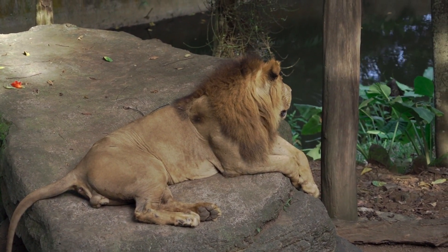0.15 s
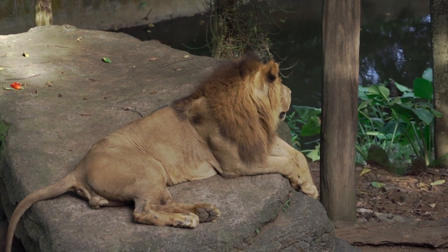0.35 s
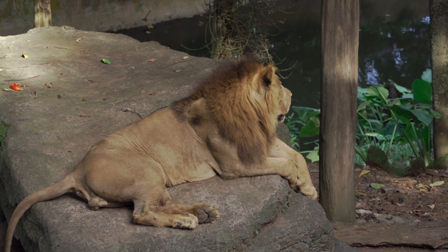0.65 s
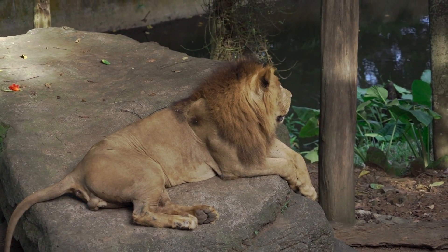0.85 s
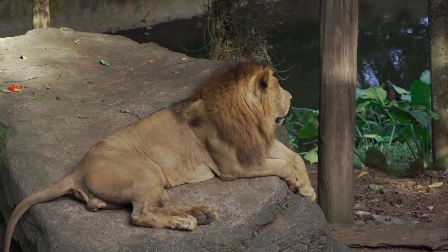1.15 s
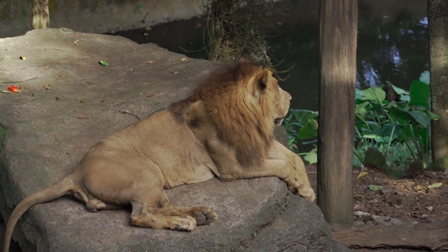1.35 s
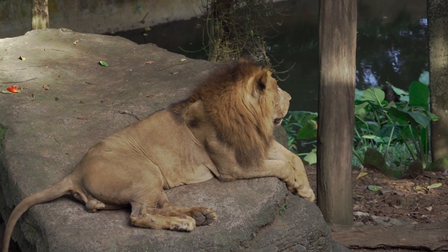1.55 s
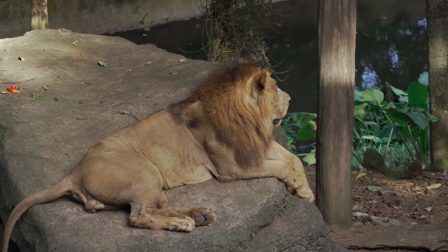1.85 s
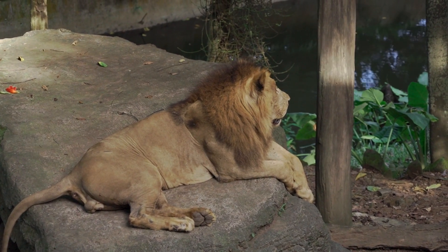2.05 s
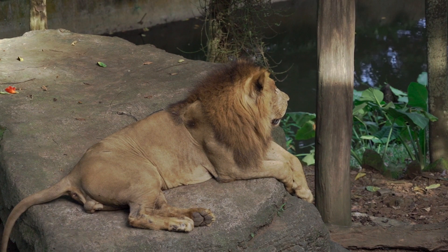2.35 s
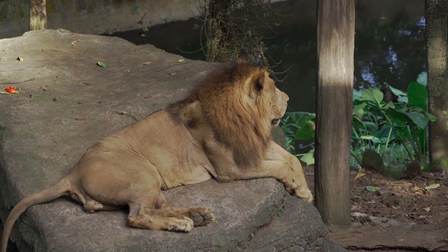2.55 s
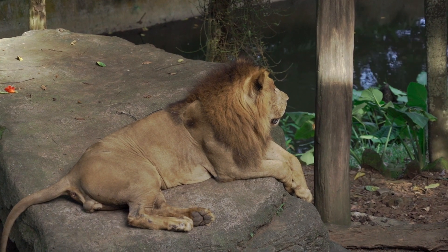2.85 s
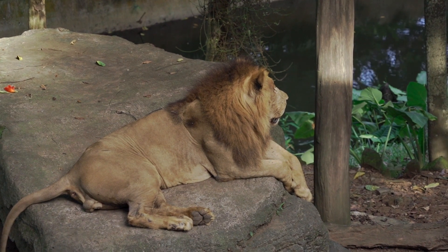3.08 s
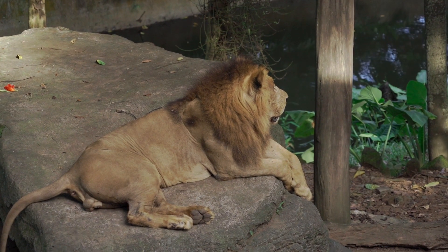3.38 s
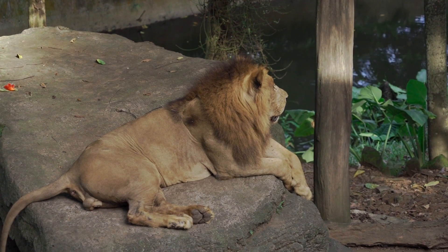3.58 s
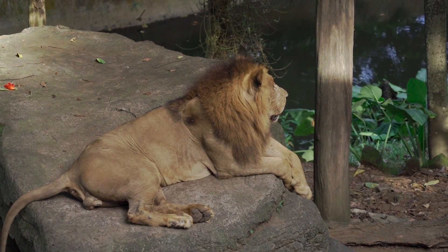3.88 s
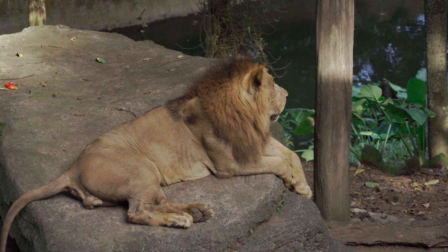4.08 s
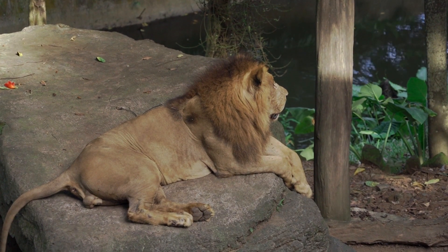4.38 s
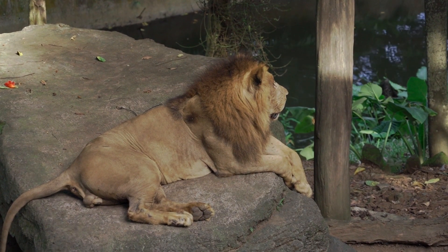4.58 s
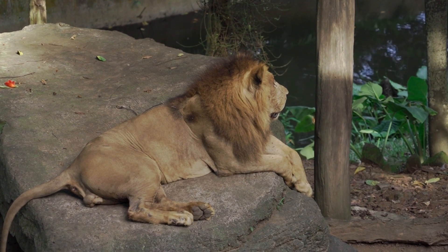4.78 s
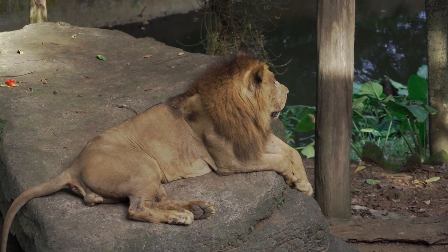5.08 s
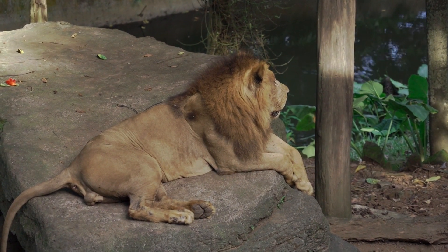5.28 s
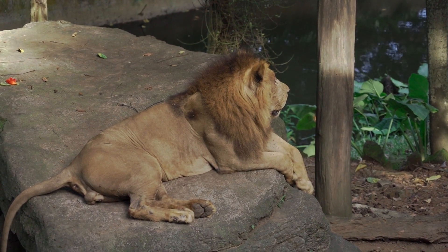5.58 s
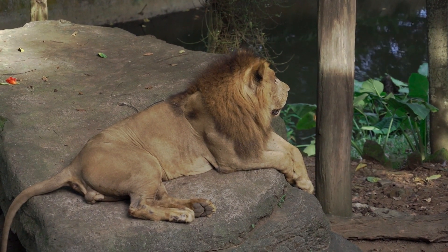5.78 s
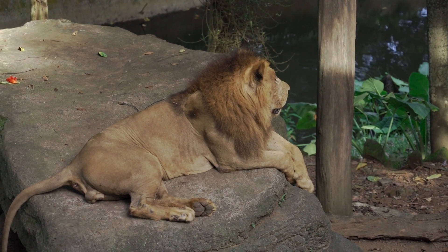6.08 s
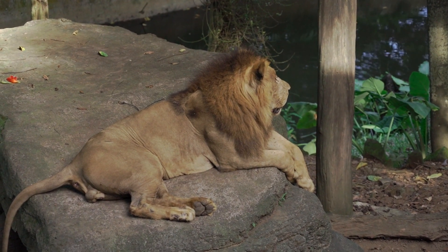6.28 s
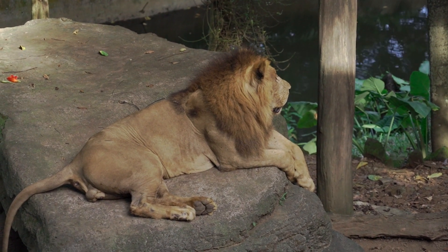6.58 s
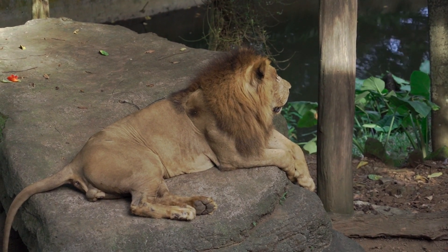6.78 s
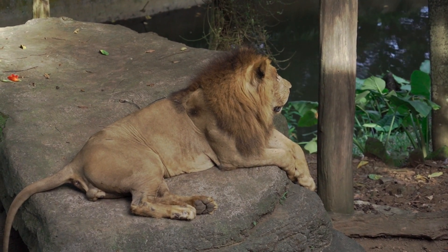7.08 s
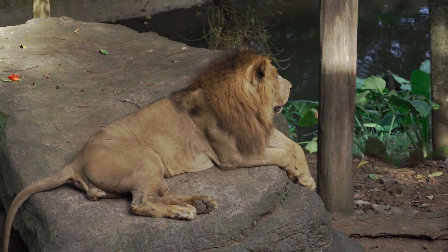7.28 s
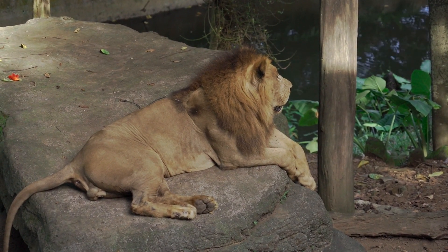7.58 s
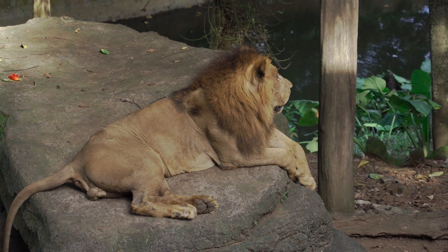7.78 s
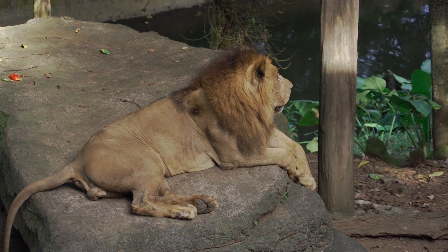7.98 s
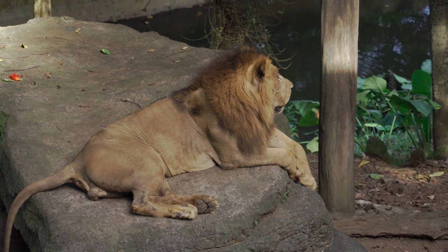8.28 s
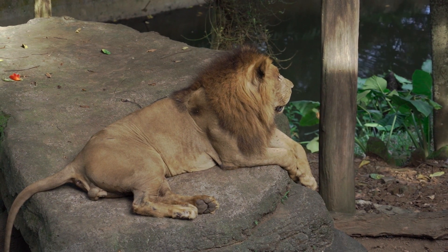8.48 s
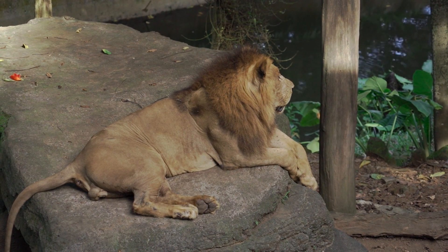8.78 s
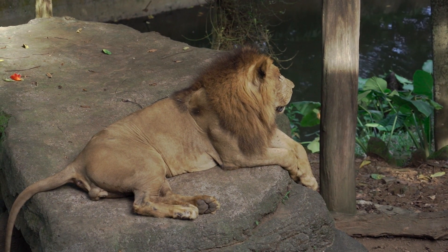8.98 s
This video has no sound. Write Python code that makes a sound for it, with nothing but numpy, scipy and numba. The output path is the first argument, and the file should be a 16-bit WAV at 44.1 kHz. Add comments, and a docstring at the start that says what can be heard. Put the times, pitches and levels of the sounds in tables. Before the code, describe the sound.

A male lion roars right from the start, off to the right in a large hard-walled enclosure. The first roar is rough and throaty, rising and then sinking into a deep growl before it ends at about 1 second. Two somewhat softer roars follow, from about 2 to 3 seconds and from 4 to 5 seconds. A stronger, more moaning fourth roar runs from 6 to 7 seconds, and a strong, breathy fifth from about 7.7 to 8.6 seconds. Each starts quickly with an uneven rattle in the throat, carries a rasp of air and trails off low. The walls ring on for a couple of seconds after every roar, filling the gaps and spreading a little to the left. A faint steady hiss and a distant, wavering low hum lie underneath as the last echo fades at around 9 seconds.

```python
"""Five lion roars ring out in a large hard-walled enclosure, off to the right.
The male's slack vocal folds flap unevenly, now and then slapping hard, into a long throat whose
resonances rise and sink with the larynx. The mouth rings, air rasps past the folds, and each roar
runs out in a deep growl. The walls ring on for seconds, over a faint hiss and a wavering far hum."""
import sys
import numpy as np
from scipy import signal
from scipy.fft import rfft, irfft, next_fast_len
from scipy.io import wavfile
from scipy.ndimage import uniform_filter1d, map_coordinates
from numba import njit

SR = 44100
rng = np.random.default_rng(int(sys.argv[2]) if len(sys.argv) > 2 else 0)


def output_pcm(signal):
    """Save a mono or channel-first signal as 16-bit PCM at the path in sys.argv[1].

    Samples are clipped to [-1, 1] before scaling.
    """
    pcm = np.clip(np.atleast_2d(signal).T, -1, 1) * 32767
    wavfile.write(sys.argv[1], SR, np.round(pcm).astype(np.int16))


N = 403074
T = np.arange(N) / SR

# the growl at the tail of each roar: t/s, level/dB
GROWLS = [(0.581, -63), (2.718, -83), (4.8, -73), (6.77, -60), (8.45, -64)]
# the hardest slaps of the folds: t/s, strength/dB, send to the two lowest resonances/dB, to the mouth/dB
SLAPS = [(0.117, -33, 5.5, -16), (0.143, -32, -1, -18), (0.168, -34.5, -9, -4), (0.191, -35, 7.5, -12),
         (0.281, -37, 3, 5), (0.49, -37, -9, 2), (1.968, -51.5, -7.5, 7), (2.023, -50, -1.5, -6),
         (2.048, -53, 0, -3), (2.214, -47, 1, 3), (2.285, -47.5, 1, -2.5), (2.302, -51, 13, -3.5),
         (2.35, -48, 8, -6), (4.066, -54.5, 2, -1.5), (4.117, -44, 7, 0), (4.29, -45.5, -2, 1),
         (4.316, -45, -13, -8), (4.345, -48, -3, -2), (4.383, -42, -19, -3), (4.41, -41, 4, -9),
         (4.471, -41, -6, -6.5), (4.521, -46, -9, 0), (6.066, -40.5, 7, -6), (6.128, -36, 2.5, -8.5),
         (6.219, -37.5, 1.5, -3), (6.278, -40.5, -4.5, -7), (6.314, -37, -6, 2), (6.357, -34, -4, -11),
         (6.391, -31, -9, -9), (6.493, -29.5, -4.5, -5), (6.691, -36.5, 1, -6), (7.742, -59, -9, 0),
         (7.799, -44, 1, -5.5), (7.867, -44.5, 0, -3), (7.967, -34.5, -4, 4), (8.064, -39, -3, 6)]


def amp(db):
    """Decibels to gain."""
    return 10 ** (np.asarray(db) / 20)


def unit(x):
    """Scaled to rms 1."""
    return x / np.sqrt(np.mean(x ** 2) + 1e-20)


def along(points, hz):
    """Read (f/Hz, value) breakpoints on a log axis."""
    f, v = np.transpose(points)
    return np.interp(np.log(hz + 1), np.log(f + 1), v)


def curves(rows):
    """An automation curve for each column after the time."""
    s, *cols = np.transpose(rows)
    return [np.interp(T, s, c) for c in cols]


def swells(rows):
    """A bell-shaped swell for each (t/s, level/dB, half-width/s)."""
    return sum(amp(db) * np.exp(-((T - s) / width) ** 2) for s, db, width in rows)


def wobble(rate):
    """A smooth random curve, rate knots a second."""
    return map_coordinates(rng.standard_normal(int(N * rate / SR) + 4), [T * rate])


def sine(hz):
    """A tone that follows a pitch curve."""
    return np.sin(2 * np.pi * np.cumsum(hz) / SR)


def filtered(x, response):
    """x times a complex response of frequency."""
    m = next_fast_len(x.shape[-1] + SR // 2)
    return irfft(rfft(x, m) * response(np.fft.rfftfreq(m, 1 / SR)), m)[..., :x.shape[-1]]


def eq(x, points):
    """Colour x with (f/Hz, gain/dB) breakpoints."""
    return filtered(x, lambda f: amp(along(points, f)))


def band(x, hz, width, stages=2):
    """Static band-passes in series, gain 1 at the centre."""
    return filtered(x, lambda f: (1j * f * width / (hz * hz - f * f + 1j * f * width)) ** stages)


def paired(two, likeness):
    """Two unrelated signals mixed to a given left-right likeness."""
    turn = lambda f: np.arccos(np.clip(along(likeness, f), -1, 1)) / 2
    mid, side = filtered(two, lambda f: np.array([np.cos(turn(f)), np.sin(turn(f))]))
    return np.array([mid + side, mid - side])


@njit
def glide(x, hz, width):
    """A resonance whose centre moves: a spinning, fading phasor fed by x."""
    step = np.exp((2j * np.pi * hz - np.pi * width) / SR)
    y, z = np.empty(len(x)), 0j
    for i in range(len(x)):
        z = z * step[i] + x[i]
        y[i] = z.real
    return y


def resonance(flow, slaps, hz, width):
    """A sharp moving resonance in a wide one; a gentle compressor evens the flow, slaps stay sharp."""
    body, hit = [glide(glide(x, hz, width), hz, 3 * width) for x in (flow, slaps)]
    size = np.std(body)
    power = np.abs(uniform_filter1d(body ** 2, SR // 15)) / size ** 2
    return unit(body / (power + 0.044) ** 0.28) + hit / size


def hiss():
    """A thin, steady bed of noise."""
    # hiss colour: f/Hz, level/dB
    colour = [(20, -25.5), (50, -2.5), (120, -12), (500, -5.5), (1200, -9.5), (2500, -26), (5000, -29),
              (10800, -35.5), (11500, -44.5), (16000, -47)]
    noise = eq(rng.standard_normal((2, N)), colour)
    return amp(-70) * unit(paired(noise, likeness=[(60, 0.42), (200, 0.8), (1000, 0.26), (9000, 0.2)]))


def far_hum():
    """A low hum that swells and wavers, a little differently on each side."""
    # hum fader: t/s, level/dB
    fader = [(0, -70), (1.4, -76), (2.1, -86), (2.6, -66), (3.1, -67.5), (4.2, -78.5), (4.9, -74),
             (5.6, -68), (6.4, -68.5), (7.8, -74.5), (9.14, -64.5)]
    tone = sine(59.5 + 4.5 * wobble(14))
    return amp(curves(fader)[0] + 3.5 * wobble(5) + np.array([wobble(6.4), wobble(6.6)])) * tone


def enclosure(x):
    """Near rock answers first; then the walls ring on, the lows longest."""
    # decay of the walls: f/Hz, t60/s
    decay = [(60, 3.44), (210, 3.35), (560, 2.96), (1470, 2.55), (3880, 1.74), (9000, 1.4)]
    # colour of the near rock's answer: f/Hz, gain/dB
    rock_colour = [(1000, 0), (4000, -7.5), (10000, 4)]
    # stereo image of the echoes: f/Hz, left-right likeness
    likeness = [(60, 0.91), (100, 1), (180, 0.04), (300, 0.73), (600, 0.02), (3000, 0.012)]
    hz, t, spectrum = signal.stft(rng.standard_normal((2, 3 * SR)), SR, nperseg=512)
    tail = signal.istft(spectrum * amp(-60 * t / along(decay, hz)[:, None]), SR, nperseg=512)[1]
    t = np.arange(tail.shape[1]) / SR
    rock = eq(rng.standard_normal(tail.shape) * amp(-60 * t / 0.1), rock_colour)
    early = amp(-3.5) * rock / np.linalg.norm(rock[0])
    late = amp(-7) * tail / np.linalg.norm(tail[0]) * (1 - np.exp(-t / 0.016))
    predelayed = np.pad(x, (300, 0))[None]
    echoes = signal.fftconvolve(predelayed, paired(early + late, likeness), axes=1)[:, :N]
    return echoes * amp([[1.3], [-1.3]])  # the far walls stand to the left


def whistles():
    """Brief wet whistles between tongue and teeth: blips of narrow noise."""
    # whistles: t/s, f/Hz, level/dB, half-width/s
    blips = [(2.113, 3534, -62.5, 0.017), (4.21, 3630, -66.5, 0.041), (6.158, 4673, -58.5, 0.022)]
    return sum(amp(db) * np.exp(-2 * ((T - s) / width) ** 2) * unit(band(rng.standard_normal(N), hz, 480))
               for s, hz, db, width in blips)


def growls(centre_hz=57, sag_hz_per_s=75):
    """As a roar runs out, the folds drop to a deep, wavering tone that sags through its swell."""
    since = T - np.array([s for s, db in GROWLS])[:, None]
    since_nearest = since[np.abs(since).argmin(axis=0), np.arange(N)]
    hz = np.clip(centre_hz - sag_hz_per_s * since_nearest, 30, 90) + 3 * wobble(22)
    return swells([(s, db, .11) for s, db in GROWLS]) * amp(2.5 * wobble(20)) * sine(hz)


def moans(lowest_hz):
    """The folds lock to the lowest throat resonance in a clear, unsteady moan."""
    # moans: t/s, level/dB, half-width/s
    cues = [(.16, -48.5, 0.14), (.48, -48.5, 0.1), (2.06, -54.5, 0.077), (2.4, -55, 0.038),
            (2.65, -52.5, 0.16), (4.15, -50.5, 0.078), (6.06, -50, 0.055), (6.21, -44.5, 0.084),
            (6.4, -42, 0.12), (6.74, -45.5, 0.04), (7.85, -50.5, 0.074), (8.32, -57.5, 0.2)]
    return swells(cues) * amp(3.5 * wobble(35)) * sine(lowest_hz * (1 + 0.0507 * wobble(50)))


def chest(drive, opening):
    """The chest booms under the voice: less with the mouth open, more around a growl."""
    growling = swells([(s, 0, 0.26) for s, db in GROWLS])
    return amp(-16 - 3 * opening + 3.5 * growling) * unit(band(drive, 150.5, 51))


def rasp(drive, modes, effort_db, floor_db, chop=.5):
    """Air tears past the folds, chopped by their flaps; part of it rings in the mouth."""
    # colour of the tearing air: f/Hz, level/dB
    colour = [(1200, -52.5), (1700, -8), (2400, -19), (3200, -21.5), (5000, -9.5), (8000, -22.5),
              (10500, -28.5), (12500, -42), (14000, -73.5)]
    # stereo image of the air: f/Hz, left-right likeness
    likeness = [(1500, .6), (5000, .4)]
    # the air stream swells once a roar: t/s, level/dB, half-width/s
    breaths = [(.45, -71, 0.41), (2.58, -68.5, 0.54), (4.65, -66.5, 0.31), (6.52, -68.5, 0.24),
               (8.2, -61.5, 0.27)]
    pulses = unit(np.sqrt(np.abs(uniform_filter1d(drive ** 2, SR // 150))))
    gusts = (1 - chop + chop * pulses) * amp(1.4 * wobble(16))
    noise = gusts * paired(rng.standard_normal((2, N)), likeness)
    rung = sum(amp(db) * np.array([unit(glide(side, hz, width)) for side in noise])
               for hz, width, db in modes)
    tearing = unit(unit(eq(noise, colour)) + amp(3) * unit(band(rung, 3200, 3500)))
    push = np.clip(uniform_filter1d(effort_db + 113, SR // 10) / 40, 0, 1) ** 2
    return (swells(breaths) * push + amp(floor_db)) * tearing


def mouth(flow, slaps, effort_db, back_hz=2300, forward_hz=2750):
    """The mouth's bright ring, tuned by the tongue, and its modes (f/Hz, width/Hz, level/dB)."""
    # one curve a roar: t/s, ring level/dB, main resonance/Hz
    moves = [
        [(0.0, -65, 2450), (0.17, -60.5, 2500), (0.26, -51, 2810), (0.42, -59.5, 2290), (0.598, -58.5, 2220),
         (0.676, -54, 2379), (0.9, -77, 2570)],
        [(1.95, -83, 2330), (1.984, -55.5, 2350), (2.005, -75, 2360), (2.058, -56.5, 2230), (2.09, -74, 2360),
         (2.2, -65, 2740), (2.55, -56.5, 2756), (2.7, -60.5, 2180), (3.0, -67, 2440)],
        [(4.04, -102, 2310), (4.075, -66, 2240), (4.1, -74, 2230), (4.15, -60.5, 2110), (4.19, -72.5, 2250),
         (4.3, -66, 2710), (4.62, -63.5, 2735), (4.73, -63.5, 2240), (4.906, -59.5, 2300), (5.05, -69.5, 2410)],
        [(5.98, -88, 2400), (6.018, -61, 2330), (6.054, -77, 2250), (6.075, -61, 2160), (6.128, -61.5, 2460),
         (6.3, -59, 3050), (6.5, -57, 2800), (6.76, -53.5, 2490), (6.9, -82, 2500)],
        [(7.72, -88, 2400), (7.75, -62, 2420), (7.78, -73, 2310), (7.85, -62, 2150), (7.97, -54, 2880),
         (8.15, -57, 2680), (8.36, -51.5, 2140), (8.45, -56.5, 2590), (8.6, -73, 2250)],
    ]
    # mouth resonances, tongue back: f/Hz, shift per Hz of the main one, width/Hz, level/dB,
    # change with the tongue forward/dB
    formants = [(1410, 0.044, 267, 4.5, 5.5), (1798, 0.183, 69, 8, -10), (2143, 0.09, 99, 1, 3.5),
                (2282, 0.98, 240, 7, -2), (2840, 0.79, 240, 0, -8.5), (3510, 0.83, 280, -5, 1),
                (4500, 0.41, 430, -9, 0)]
    ring_db, main_hz = curves(sum(map(list, moves), []))
    forward = np.clip((main_hz - back_hz) / (forward_hz - back_hz), 0, 1)
    modes = [(hz + follows * (main_hz - back_hz), width, db + forward_db * forward)
             for hz, follows, width, db, forward_db in formants]
    ring = sum(amp(db + 2.5 * wobble(24)) * resonance(flow, slaps, hz, width) for hz, width, db in modes)
    fade_db = np.clip(-59.5 - effort_db, 0, 50)
    return amp(ring_db - fade_db) * unit(band(ring, 2500, 6700)), modes


def fold_flow(upper_db, scatter=.22, size_db=2.2, flutter_db=2.2, breath=0.49):
    """Uneven flaps of uneven size, mixed with breath; more effort, faster flapping."""
    flaps_per_s = np.clip(190 + 14 * (upper_db + 42), 44, 210)
    beats = np.cumsum(np.exp(scatter * rng.standard_normal(N // 100)))
    sizes = amp(size_db * rng.standard_normal(N // 100))
    turns = np.cumsum(flaps_per_s) / SR
    at = np.searchsorted(turns, beats[beats < turns[-1]])
    flaps = np.zeros(N)
    flaps[at] = sizes[:len(at)] / np.sqrt(flaps_per_s[at])
    flow = np.sqrt(1 - breath) * unit(flaps) + np.sqrt(breath) * rng.standard_normal(N)
    return unit(flow * amp(flutter_db * wobble(55)))


def fold_slaps(flow, upper_db, strays_per_s=8, puff_rise_s=.002, puff_t60_s=.025):
    """Each slap is a dry click and a puff of flow, sent to the upper throat, lower throat and mouth."""
    when, chance, size = rng.random((int(N / SR * 60), 3)).T  # weaker slaps at chance moments
    clicks = np.zeros((3, N))
    clicks[:, (when * N).astype(int)] = (chance < strays_per_s / 60) * amp(5 + 6.4 * size)
    for s, db, low_db, mouth_db in SLAPS:
        at = round(s * SR)
        over_flow_db = min(db - upper_db[at] + 17, 34)
        clicks[:, at] = amp(over_flow_db + np.array([0, low_db, mouth_db]))
    onsets = uniform_filter1d(clicks, int(puff_rise_s * SR))
    puffs = signal.lfilter([1], [1, -amp(-60 / (puff_t60_s * SR))], onsets) * flow
    return band(amp(-6) * clicks + amp(-18) * puffs, 1200, 3900, stages=1)  # sharp, with little low push


def fold_closure(depth=.5, lead_s=.012):
    """The folds close up just before a hard slap and duck the flow."""
    times = np.array([row[0] for row in SLAPS] + [np.inf])
    until = times[np.searchsorted(times, T)] - T
    closing = np.exp(-(until / lead_s) ** 2) * (until > .001)
    return 1 - depth * uniform_filter1d(closing, SR // 400)


def roar_curves(attack_s=.0027, release_s=.17):
    """The automation of the five roars, each with a quick start and a trailing end."""
    # one curve a roar: t/s, effort/dB, lowest throat resonance/Hz, resonances 2, 3, 4 over the lowest/dB
    roars = [
        [(0, -48.5, 298, -5, -8, -20), (.08, -52, 318.2, -8, -4, -11), (.14, -48, 343, -2, -9, -18),
         (.27, -46, 341, 1, 5, 3), (.4, -43, 260, -3, -3, -3), (.45, -42, 223.5, -5, -3, -7),
         (.58, -46.5, 185, 0, -9, -3), (.65, -53, 162, 2, 1, 1), (.85, -58.5, 168.2, 0, -3, -5)],
        [(1.95, -62.5, 168.6, -16.5, -7.5, -19), (1.974, -44, 177.4, -10, -16, -15),
         (2.0, -56, 197.5, -8, -14, -9), (2.064, -46, 263.4, 2, -14, -11), (2.2, -55, 298.3, -4, -3, -5),
         (2.4, -48, 362, -1, -3, 1), (2.53, -46.5, 334.4, 0, 3, 0), (2.61, -44, 218.2, -2, 0, -5),
         (2.71, -53, 181.5, -3, -6, -3), (2.95, -55, 153.4, -4, -11.5, -10)],
        [(4.04, -68, 158, -20.5, -20, -23), (4.068, -57, 170.2, 2, -16.5, -8.5),
         (4.096, -59, 194.6, 0, -21, -12), (4.14, -50.5, 224, 2, -16, -4.5), (4.27, -54, 289.4, -5, -3, -6),
         (4.48, -52, 300.7, -1, -4, -1), (4.575, -46.5, 273, 4, -2, -1), (4.67, -44, 222.5, -3, -9, -3),
         (4.74, -48, 176.6, -3, -7, -5), (5.0, -56.5, 149.2, -3, -2, -10.5)],
        [(5.98, -71, 156.4, 6, -4, 2), (6.015, -55.5, 162, 1, -17.5, -9), (6.084, -44.5, 198.3, 3, -19.5, -3),
         (6.13, -49.5, 224.9, 1, -5, 2), (6.3, -43, 293, -10, -12, 1), (6.41, -49, 282.4, 5, -2, 4),
         (6.526, -44.5, 241.6, 6, -1, -2), (6.6, -43.5, 184.1, 0, -10, -6), (6.75, -52, 140.4, 8, -2, -2),
         (6.85, -56, 144.3, 4, 1, -7)],
        [(7.72, -78.5, 149.7, 20, 14, 14.5), (7.75, -49, 153.7, -24, -14, -10),
         (7.786, -51, 165.6, -12, -18.5, -22), (7.844, -41, 203.2, -10, -16, -17),
         (7.964, -46, 239.5, -3, -6, 1), (8.05, -49, 279.5, 5, 2.5, 1), (8.154, -40, 255.6, 3, -3.5, -1),
         (8.3, -46, 187.8, 0, -3, -5.5), (8.4, -48, 136.4, 0, -1, -7), (8.55, -61.5, 140.6, 6.5, -0.5, 3.5)],
    ]
    # one row a roar: resonances 2, 3, 4 with the mouth closed/Hz, chest trim/dB, rasp trim/dB,
    # lowest mouth resonance over the throat's fourth/dB
    throats = [(505, 823, 1195, 0, 3.2, -12), (501, 831, 1199, -4, -4.5, -11.5),
               (495, 780, 1152, -1.5, -4, -9.5), (481, 738, 1141, 1, 2.5, -11),
               (469, 750, 1155, 3, -4, -10)]
    hush = lambda row, s: (row[0] + s, -110, *row[2:])
    rows = []
    for roar, shape in zip(roars, throats):
        rows += [(*row, *shape) for row in [hush(roar[0], -attack_s), *roar, hush(roar[-1], release_s)]]
    return curves(rows)


def larynx(opening, closed_hz, drift=.015):
    """Throat resonances 2, 3, 4 climb as the mouth opens and sink ahead of the lowest."""
    # for each: climb from closed to wide open/Hz
    climbs = [151, 142, 170]
    # for each: power of the climb (a larger one climbs later)
    bends = [3.06, 0.82, 1.15]
    # for each: head start in sinking/s
    leads = [0.12, 0.051, 0.03]
    ahead = lambda s: np.minimum(opening, np.interp(T + s, T, opening))
    return [(hz + climb * ahead(lead) ** bend) * (1 + drift * wobble(9))
            for hz, climb, bend, lead in zip(closed_hz, climbs, bends, leads)]


def throat(flow, low_slaps, high_slaps, hz, levels_db):
    """The body of the roar: the folds drive four moving resonances of alternating polarity."""
    # throat resonances, lowest first: width/Hz
    widths = [105, 62, 66, 120]
    slaps = [low_slaps, low_slaps, high_slaps, high_slaps]
    body = sum((-1) ** k * amp(levels_db[k]) * resonance(flow, slaps[k], hz[k], widths[k])
               for k in range(4))
    return band(body, 529, 1660)


def lion(shut_hz=150, open_hz=350):
    """Flaps and slaps sound through throat, mouth and chest, with moans, rasp and whistles on top."""
    effort_db, lowest_hz, *upper, chest_trim_db, rasp_trim_db, fifth_trim_db = roar_curves()
    over_db, closed_hz = upper[:3], upper[3:]
    opening = np.clip((lowest_hz - shut_hz) / (open_hz - shut_hz), 0, 1)
    throat_hz = [lowest_hz] + larynx(opening, closed_hz)
    throat_db = [effort_db] + [effort_db + db for db in over_db]
    upper_db = 10 * np.log10(sum(amp(db) ** 2 for db in throat_db[1:]))

    flow = fold_flow(upper_db)
    high_slaps, low_slaps, mouth_slaps = fold_slaps(flow, upper_db)
    body = throat(flow, low_slaps, high_slaps, throat_hz, throat_db)
    fill = amp(upper_db - 14) * unit(band(flow + high_slaps, 750, 760, stages=3))  # between resonances
    ring, modes = mouth(flow, mouth_slaps, effort_db)
    # the lowest mouth resonance also sounds with the throat's fourth
    fifth = amp(throat_db[3] + fifth_trim_db - 2.5 * opening) * resonance(flow, high_slaps, *modes[0][:2])
    boom = amp(effort_db + chest_trim_db) * chest(flow + high_slaps, opening)

    rasp_db = -72 + 0.32 * (upper_db + 50) + rasp_trim_db - 4 * opening
    fade_db = np.clip(-50 - effort_db, 0, 40)
    breath = rasp(flow + .5 * mouth_slaps, modes[3:], effort_db, floor_db=rasp_db - fade_db)
    duck = fold_closure()
    voice = duck * (body + fill + fifth + ring)
    return voice + np.sqrt(duck) * breath + moans(lowest_hz) + boom + whistles()


def scene():
    """The direct roar favours the right side; above the bass it reaches the left a little later."""
    # direct sound, left against right: f/Hz, gain/dB
    far_side = [(100, 0), (200, 2.5), (330, -5), (500, -9), (750, -8), (1150, -13), (2600, -13), (5000, -7),
                (8000, -3), (12000, 1)]
    left, right = lion()
    lag_s = lambda f: 0.001548 * f * f / (f * f + 300 ** 2)
    left = filtered(left, lambda f: amp(along(far_side, f)) * np.exp(-2j * np.pi * f * lag_s(f)))
    direct = amp(3) * (np.array([left, right]) + growls())
    return direct + enclosure(right) + hiss() + far_hum()


def record(dry):
    """A brick-wall low-pass trims the very top."""
    return filtered(dry, lambda hz: hz < 15700)


dry = scene()
out = record(dry)
output_pcm(out)
```